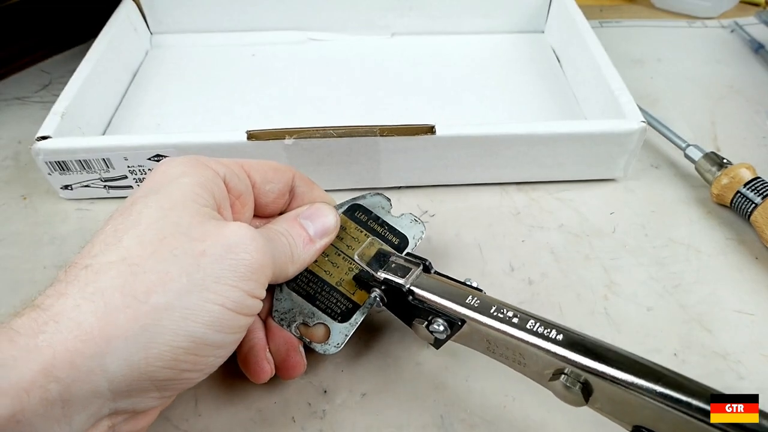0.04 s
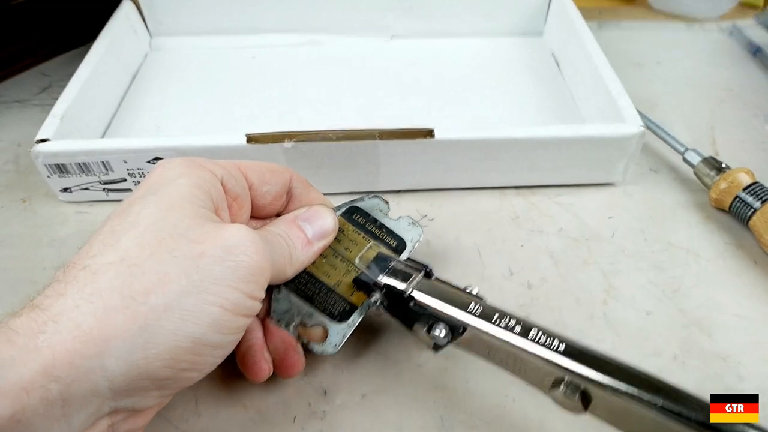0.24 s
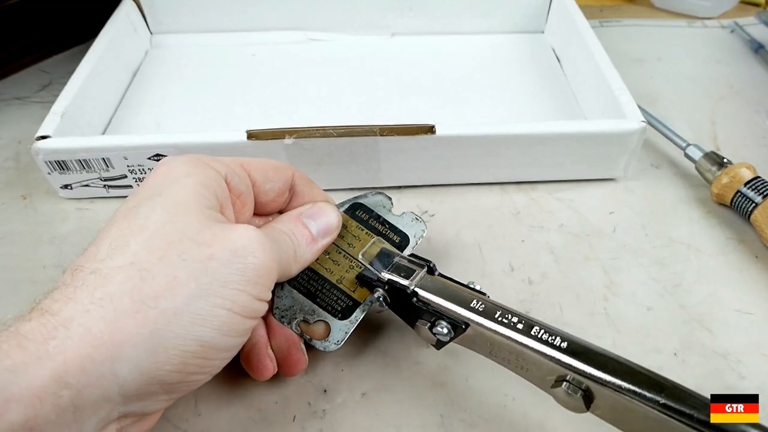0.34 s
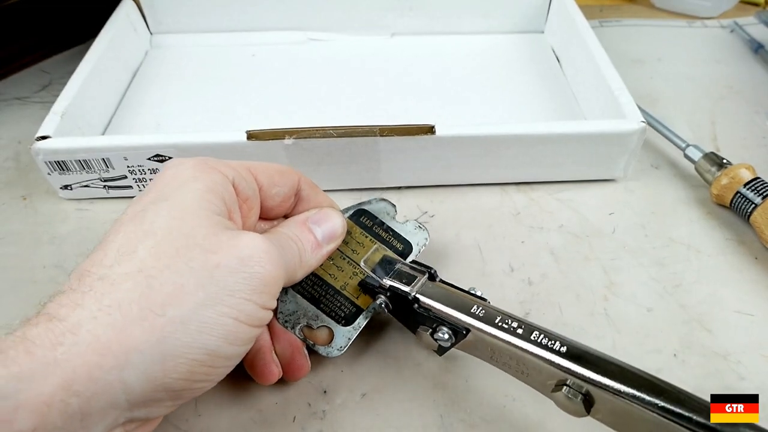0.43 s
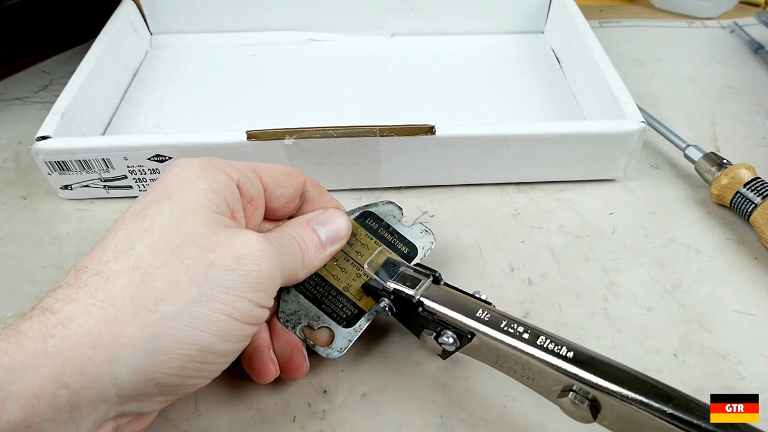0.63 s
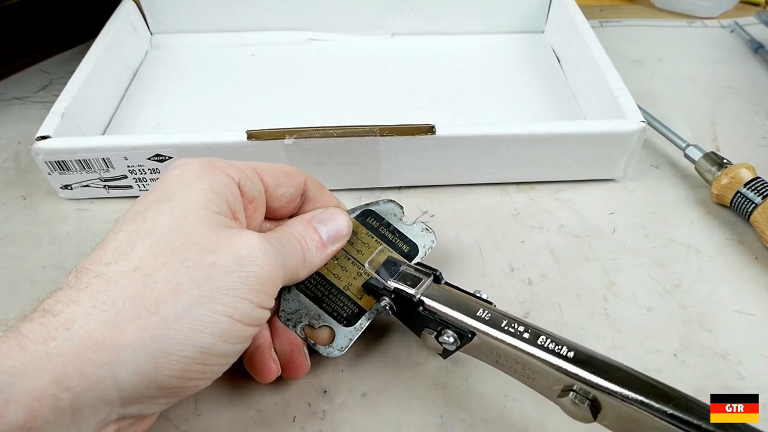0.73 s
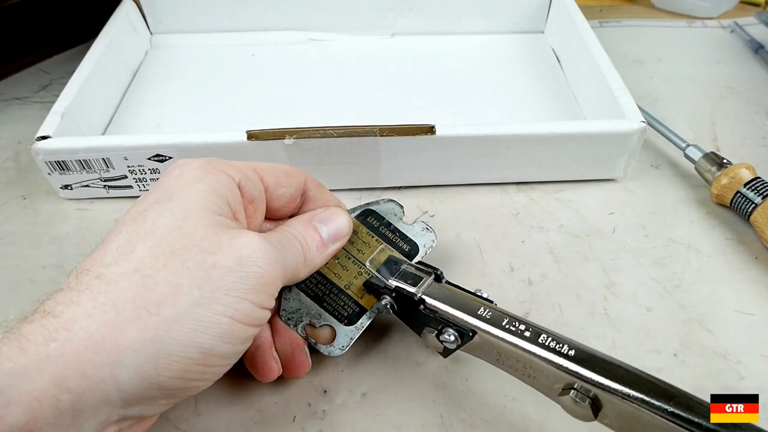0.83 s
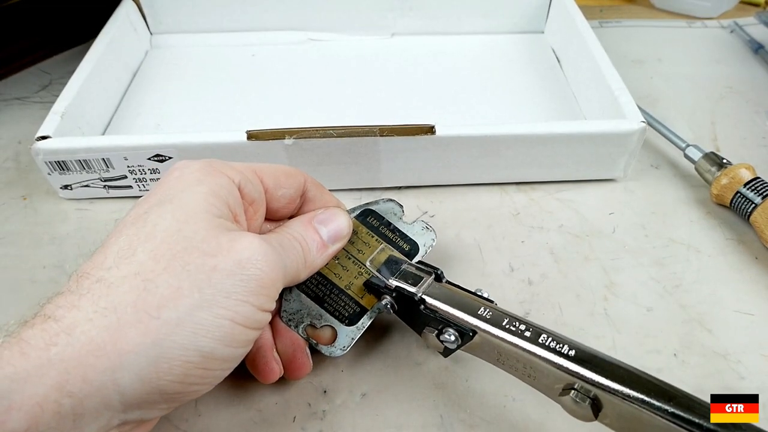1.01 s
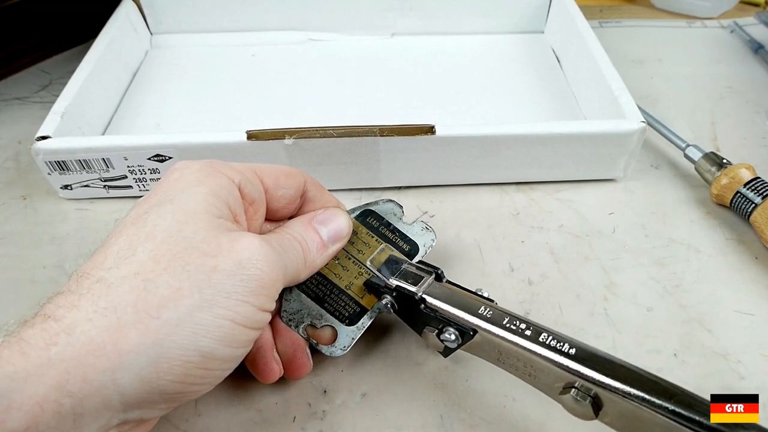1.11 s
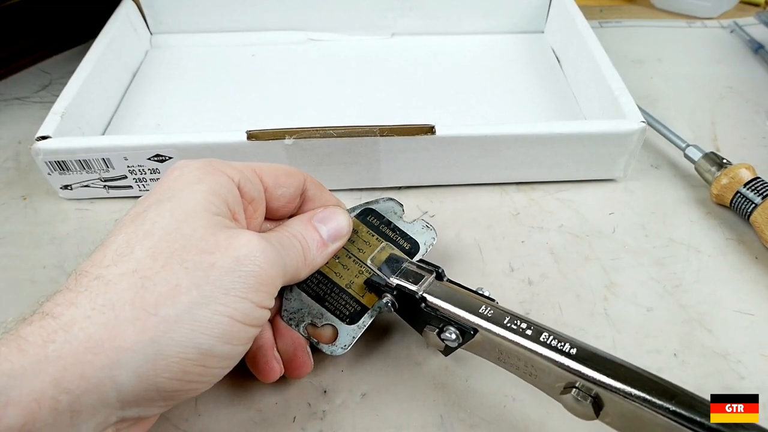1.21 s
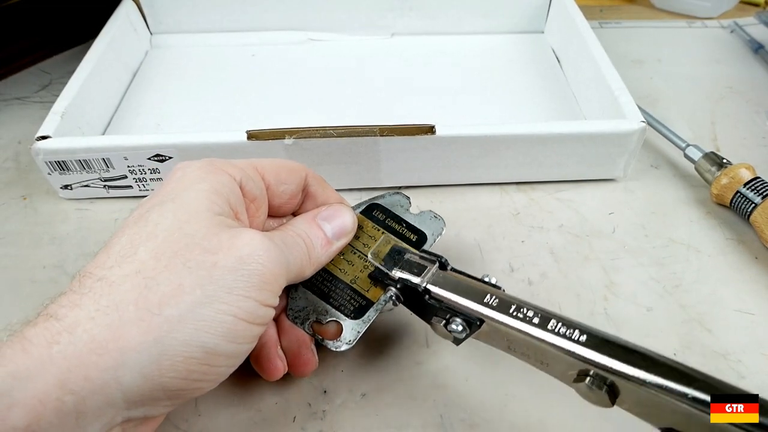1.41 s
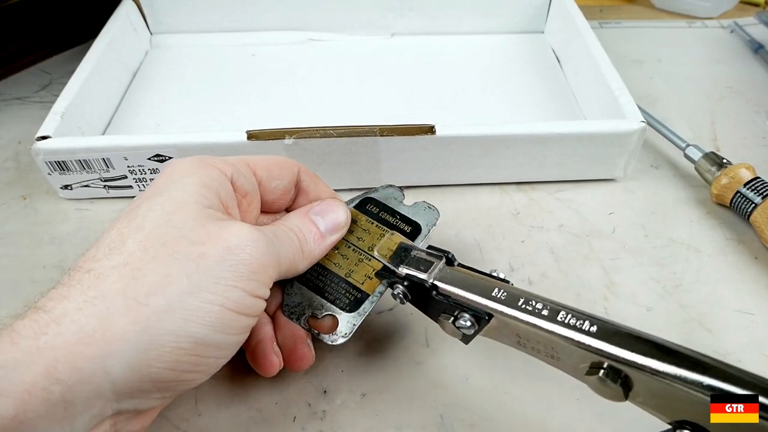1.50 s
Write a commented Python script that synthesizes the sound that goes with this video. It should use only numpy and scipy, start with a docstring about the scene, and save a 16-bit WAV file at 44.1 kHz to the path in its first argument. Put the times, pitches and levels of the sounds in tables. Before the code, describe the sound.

A hand nibbler snaps through thin steel with one loud, sharp metallic crack, very close up.

```python
"""A hand nibbler bites a thin steel plate, close to one microphone over a workbench.
Over room tone, hum and rustling hands, faint scrapes and ticks of the jaws come first, as shaped noise.
The steel tears and snaps: a noise crack and ringing modes overload the input, and jolts boom in the bench.
Tool and plate tick and scrape as they settle; the handles open with a squeak of two gliding tones,
and near the end the punch clicks free with one tiny bright pulse."""
import sys
import numpy as np
from scipy import signal
from scipy.fft import rfft, irfft, next_fast_len
from scipy.io import wavfile
from scipy.ndimage import map_coordinates

SR = 44100
rng = np.random.default_rng(int(sys.argv[2]) if len(sys.argv) > 2 else 0)


def materialize(psi):
    """Save the field psi as 16-bit PCM at rate SR to the path in sys.argv[1].

    A 1-D psi becomes a single channel; in a 2-D psi each row is a channel.
    """
    bounded = np.clip(np.atleast_2d(psi).T, -1, 1)
    quanta = np.round(bounded * 32767).astype(np.int16)
    wavfile.write(sys.argv[1], SR, quanta)


N = 68355
t = np.arange(N) / SR  # time in seconds


def amp(db):
    """Decibels to gain."""
    return 10 ** (np.asarray(db) / 20)


def unit(x):
    """Scale to rms 1."""
    return x / np.sqrt(np.mean(x ** 2) + 1e-20)


def along(points, hz):
    """Read (Hz, value) points at hz, in straight lines on a log frequency axis."""
    point_hz, values = np.transpose(points)
    return np.interp(np.log(hz + 1), np.log(point_hz + 1), values)


def curves(rows):
    """One value per sample for each column after the time."""
    times, *columns = np.transpose(rows)
    return [np.interp(t, times, column) for column in columns]


def wobble(rate):
    """A smooth random curve, rate knots a second."""
    return map_coordinates(rng.standard_normal(4096), [t * rate], mode="wrap")


def filtered(x, response):
    """Multiply the spectrum of x by a response of frequency."""
    size = next_fast_len(N + 8192)  # padded, so that the end does not wrap to the start
    spectrum = rfft(x, size) * response(np.fft.rfftfreq(size, 1 / SR))
    return irfft(spectrum, size)[:N]


def noise(colour):
    """Noise of rms 1; the colour sets only the shape of its spectrum."""
    return unit(filtered(rng.standard_normal(N), lambda hz: amp(along(colour, hz))))


def bell(hz, centre, octaves):
    """A bell-shaped gain on log frequency."""
    return np.exp(-.5 * (np.log2((hz + 1) / centre) / octaves) ** 2)


def decay(start, t60, attack=0.0006):
    """Fast rise at start, then an exponential fall by 60 dB in t60 seconds."""
    age = np.maximum(t - start, 0)
    return (1 - np.exp(-age / attack)) * np.exp(-np.log(1000) * age / t60)


def ring(start, hz, t60, attack=0.00022):
    """One struck mode: a sine that rises fast and dies away."""
    return decay(start, t60, attack) * np.sin(2 * np.pi * hz * (t - start))


SNAP_S = .2066
TEAR_LEAD_S, TEAR_DB, TEAR_RISE_DB = 0.0054, -26, 25.5  # the steel starts to tear just before
CRACK_DB, CRACK_T60_S = 3.5, .038
FLEX_HZ, FLEX_DB, FLEX_T60_S, FLEX_DELAY_S = 1752, 6, 0.017, .0027
STEEL_DB = -8  # added to every mode below
ROOM_DB = -10.5
# The crack of the break, close to the microphone. Each row: frequency in Hz, relative level in dB per Hz.
CRACK_COLOUR = [(100, -5.5), (200, -5.5), (330, -1), (500, -6.5), (900, -13.5), (1550, 2), (2800, -7.5),
                (4500, -7), (7000, 3), (9500, -1), (12000, -8), (16000, -18)]
# Modes of jaws, levers and plate.
# Each row: frequency in Hz, level in dB relative to STEEL_DB, t60 in seconds.
STEEL_MODES = [(650, -2, 0.065), (860, -25.5, 0.1), (1400, -10.5, 0.091), (1543, -12.5, 0.085),
               (1750, -12, 0.099), (1831, -8.5, .155), (2630, -18, .13), (3930, -13, 0.097),
               (5297, -17, 0.19), (5990, -13.5, 0.14), (6670, -11, .18), (6853, -11, 0.088),
               (7460, -11, .14), (8090, -13, .16), (9210, -12, 0.22), (10206, -16.5, .17),
               (11713, -19.5, 0.1)]


def snap():
    """The steel tears in swelling noise, cracks through and sets plate and tool ringing."""
    lead = (SNAP_S - t) / TEAR_LEAD_S  # 1 where the tear starts, 0 at the snap
    tearing = (lead > 0) & (lead < 1)
    tear = amp(TEAR_DB - TEAR_RISE_DB * np.clip(lead, 0, 1)) * tearing
    crack_level = amp(CRACK_DB) * decay(SNAP_S, CRACK_T60_S)
    crack = noise(CRACK_COLOUR) * (tear + crack_level)
    # the freed plate slaps against the die
    flex = amp(FLEX_DB) * ring(SNAP_S + FLEX_DELAY_S, FLEX_HZ, FLEX_T60_S)
    modes = sum(amp(db) * ring(SNAP_S, hz, t60) for hz, db, t60 in STEEL_MODES)
    room = amp(ROOM_DB) * room_tail(SNAP_S)
    return crack + flex + amp(STEEL_DB) * modes + shimmer() + room


SHIMMER_DB, SHIMMER_T60_S = -11, 0.18
SHIMMER_LOW_HZ, SHIMMER_HIGH_HZ = 2400, 15230
SHIMMER_TOP_HZ, SHIMMER_OCTAVES = 7100, .55  # centre and width of the strongest region
# Treble balance of the upper modes. Each row: frequency in Hz, gain in dB.
SHIMMER_TREBLE = [(10000, 0.5), (12000, -0.5), (13500, -3.5), (15300, -9)]


def shimmer():
    """Many close, quickly damped modes of the steel levers, as sines of random pitch and phase."""
    pitch = rng.uniform(SHIMMER_LOW_HZ, SHIMMER_HIGH_HZ, 420)
    phases = rng.uniform(0, 2 * np.pi, len(pitch))
    gains = bell(pitch, SHIMMER_TOP_HZ, SHIMMER_OCTAVES) * amp(along(SHIMMER_TREBLE, pitch))
    lines = np.zeros(N // 2 + 1, complex)
    bins = np.round(pitch * N / SR).astype(int)
    lines[bins] = gains * np.exp(1j * phases)
    return amp(SHIMMER_DB) * unit(irfft(lines, N)) * decay(SNAP_S, SHIMMER_T60_S)


# Jolts passed to the bench: two from the recoil of the snap, then a soft bump later on. Each row: start in
# seconds, level in dB.
JOLTS = [(0.2218, -11.5), (0.2873, -20.5), (0.488, -37)]
# Modes of the bench under the microphone.
# Each row: frequency in Hz, level in dB relative to the jolt, t60 in seconds.
BENCH_MODES = [(43.34, -8, 0.45), (58.32, 3, 0.11), (83.5, -2, 0.14), (132.8, -11, 0.38)]


def bench():
    """Each jolt strikes all the low modes of the bench, which boom."""
    return sum(amp(jolt_db + mode_db) * ring(start, hz, t60, attack=0.0055)
               for start, jolt_db in JOLTS for hz, mode_db, t60 in BENCH_MODES)


UPPER_RATIO = 1.349  # pitch of the upper tone over the lower
SQUEAK_JITTER, SQUEAK_FLUTTER_DB = 0.0066, 2.5  # random pitch (as a fraction) and level
HAZE_DB, HAZE_SPREAD = -15, 0.087  # side tones, set off by this fraction of the pitch
# Rubbing squeak while the handles open.
# Each row: time in seconds, lower pitch in Hz, level of the lower tone in dB, level of the upper tone in dB.
SQUEAK_PATH = [(1.0, 5500, -100, -81), (1.05, 6810, -99, -72.5), (1.085, 7327, -78.5, -68),
               (1.12, 7720, -72, -61.5), (1.16, 8020, -66.5, -71), (1.2, 8620, -60.5, -72),
               (1.235, 8210, -65, -71), (1.265, 7490, -76, -69), (1.281, 7500, -82, -94),
               (1.295, 8280, -68, -92), (1.318, 9500, -59.5, -77), (1.333, 10100, -56, -88),
               (1.345, 9710, -60.5, -77), (1.362, 8200, -69, -65), (1.38, 7010, -98, -75)]


def squeak():
    """Two thin friction tones glide together in pitch, each with unsteady side tones."""
    hz, low_db, high_db = curves(SQUEAK_PATH)
    sounding = (t > SQUEAK_PATH[0][0]) & (t < SQUEAK_PATH[-1][0])

    def tone(pitch, db):
        """One line of the squeak."""
        jittered = pitch * (1 + SQUEAK_JITTER * wobble(900))
        phase = 2 * np.pi * np.cumsum(jittered) / SR
        haze = amp(HAZE_DB) * wobble(40) * np.sin(HAZE_SPREAD * phase)
        level = amp(db + SQUEAK_FLUTTER_DB * wobble(150))
        return level * unit((1 + haze) * np.sin(phase))

    return sounding * (tone(hz, low_db) + tone(hz * UPPER_RATIO, high_db))


RELEASE_S, RELEASE_DB, RELEASE_ROOM_DB = 1.476, -24, -11.5
RELEASE_HZ, RELEASE_WIDTH_S = 10960, .00008


def release():
    """The punch clicks out of the cut: one tiny bright pulse, a sine under a bell-shaped envelope."""
    age = t - RELEASE_S
    envelope = np.exp(-.5 * (age / RELEASE_WIDTH_S) ** 2)
    pulse = envelope * np.sin(2 * np.pi * RELEASE_HZ * age)
    return in_room(amp(RELEASE_DB) * pulse, RELEASE_ROOM_DB)


KNOCK_T60_S, TICK_ROOM_DB = .05, -18
# Small contacts of jaws, plate and linkage, before the treble loss below. Each row: start in seconds,
# click level in dB, centre in Hz, width in octaves, click t60 in seconds, level of the plate's knock in dB.
TICKS = [(0.0824, -47.5, 2800, 1.7, .035, -47.5), (.1535, -41.5, 3900, 1.2, 0.011, -53.5),
         (.405, -48, 536, 0.84, 0.071, -53), (.459, -53.5, 800, 1.05, .04, -56),
         (0.563, -57, 1200, 2.1, 0.014, -47), (0.615, -55.5, 9000, 0.63, .015, -77),
         (.644, -48.5, 1680, 0.63, 0.027, -50.5), (0.6991, -39.5, 8300, 0.2, 0.0057, -64),
         (.699, -49.5, 3460, 0.76, 0.014, -77), (1.244, -56.5, 2000, 0.39, 0.032, -70),
         (1.34, -52, 1500, 1.16, 0.014, -50.5), (1.417, -53, 1848, 0.33, 0.028, -56.5),
         (1.487, -55, 900, .8, 0.039, -51), (1.53, -49.5, 2323, .28, 0.017, -72)]
# The hand-damped plate. Each row: frequency in Hz, relative level in dB per Hz.
KNOCK_COLOUR = [(80, -10), (300, -6.5), (480, -7.5), (620, 1), (800, -1), (1000, -11.5), (1700, -15),
                (3000, -32), (10000, -58)]
# Soft contacts lose their top. Each row: frequency in Hz, gain in dB.
TICK_TREBLE = [(10000, 0.5), (12000, -4), (16000, -14.5)]


def ticks():
    """Light contacts, each a noise click and a dull knock of the held plate, with a little room."""
    plate = noise(KNOCK_COLOUR)
    contacts = np.zeros(N)
    for start, click_db, centre, octaves, t60, knock_db in TICKS:
        grain = unit(filtered(rng.standard_normal(N), lambda hz: bell(hz, centre, octaves)))
        contacts += amp(click_db) * decay(start, t60, attack=0.00022) * grain
        contacts += amp(knock_db) * decay(start, KNOCK_T60_S) * plate
    softened = filtered(contacts, lambda hz: amp(along(TICK_TREBLE, hz)))
    return in_room(softened, TICK_ROOM_DB)


SCRAPE_ROUGH_DB = 2  # depth of the random roughness
# Steel sliding on steel. Each row: start in seconds, length in seconds, body level in dB, hiss level in dB.
SCRAPES = [(-.02, 0.058, -61, -69), (0.079, 0.027, -59, -62), (0.099, .04, -81, -68.5),
           (0.153, 0.035, -80, -58.5), (0.431, .055, -65.5, -60.5), (.465, 0.074, -61, -65),
           (0.529, 0.07, -59, -56.5), (.76, 0.21, -66, -72.5), (1.29, 0.093, -64, -68),
           (1.365, 0.075, -62, -61.5), (1.462, 0.094, -62, -62.5)]
# Lower part of the sliding. Each row: frequency in Hz, relative level in dB per Hz.
SCRAPE_BODY = [(100, -21), (550, 1), (1100, -6), (2100, -2), (3500, -19.5), (8000, -22.5)]
# Upper part of the sliding. Each row: frequency in Hz, relative level in dB per Hz.
SCRAPE_HISS = [(1000, -26), (3000, -10), (6000, -4.5), (7200, -3.5), (8800, 1), (11000, -11),
               (12500, -22.5), (16000, -40)]


def scrapes():
    """Short rough slides: two bands of noise that swell and fade."""
    body, hiss = noise(SCRAPE_BODY), noise(SCRAPE_HISS)
    slides = np.zeros(N)
    for start, length, body_db, hiss_db in SCRAPES:
        swell = np.sin(np.pi * np.clip((t - start) / length, 0, 1))
        slides += swell * (amp(body_db) * body + amp(hiss_db) * hiss)
    roughness = unit(amp(SCRAPE_ROUGH_DB * wobble(400)))
    return slides * roughness


# The workshop's diffuse answer. Each row: frequency in Hz, relative level in dB per Hz.
ROOM_COLOUR = [(60, -13.5), (200, -6.5), (500, -4), (950, -8), (1400, 0.5), (1850, 1.5), (2700, -6.5),
               (4500, -3), (7000, 0.5), (9500, -3), (12000, -11), (15000, -17.5), (16000, -28)]
# How long the workshop rings. Each row: frequency in Hz, t60 in seconds.
ROOM_T60 = [(150, 0.42), (450, .35), (700, 0.28), (1200, .2), (4000, 0.19), (9000, .18), (15000, .17)]


def room_tail(start):
    """Diffuse sound of the workshop: noise that decays band by band; the bass lingers longest."""
    hz, times, bands = signal.stft(noise(ROOM_COLOUR), SR, nperseg=256)
    age = np.maximum(times - start, 0)
    fall = np.exp(-np.log(1000) * age / along(ROOM_T60, hz)[:, None])
    tail = signal.istft(bands * fall, SR, nperseg=256)[1][:N]
    return tail * np.clip((t - start) / .004, 0, 1)  # fades in over 4 ms


def in_room(dry, room_db):
    """A small sound plus the workshop's answer, by convolution with a tail of unit energy."""
    tail = room_tail(0)
    answer = signal.fftconvolve(dry, tail / np.linalg.norm(tail))[:N]
    return dry + amp(room_db) * answer


FLOOR_DB = -53.5
HUM_HZ, HUM_DB = 60, -58
# Room tone at the microphone. Each row: frequency in Hz, relative level in dB per Hz.
FLOOR_COLOUR = [(12, -14.5), (25, -2), (42, 2), (100, -17), (230, -19), (500, -36.5), (1100, -42.5),
                (2000, -42), (7000, -45.5), (11000, -49), (16000, -59)]
# Rustle of the moving hands. Each row: time in seconds, level in dB.
HANDS_LEVEL = [(0, -60.5), (.36, -67), (.56, -57.5), (.72, -68), (.95, -71), (1.2, -60.5), (1.34, -61),
               (1.43, -67.5), (1.55, -63.5)]
# Colour of the rustle. Each row: frequency in Hz, relative level in dB per Hz.
HAND_COLOUR = [(40, -13.5), (150, 1.5), (300, -3), (700, -7.5), (1500, -21), (5000, -39.5), (16000, -50)]


def background():
    """Steady noise for room tone, a sine of mains hum, and swelling noise for the hands' shifting grip."""
    floor = amp(FLOOR_DB) * noise(FLOOR_COLOUR)
    hum = amp(HUM_DB) * unit(np.sin(2 * np.pi * HUM_HZ * t))
    hands_db, = curves(HANDS_LEVEL)
    hands = amp(hands_db) * noise(HAND_COLOUR)
    return floor + hum + hands


def scene():
    """One microphone feeds both channels."""
    mono = snap() + bench() + squeak() + release() + ticks() + scrapes() + background()
    return np.array([mono, mono])


CLIP_TOP, CLIP_HARDNESS = 1, 4.9  # ceiling as full scale; a higher hardness bends more sharply
TOP_HZ = 15900  # middle of a slope 600 Hz wide


def record(dry):
    """The input saturates towards its ceiling, then cuts what lies above its band limit."""
    overload = np.abs(dry / CLIP_TOP) ** CLIP_HARDNESS
    clipped = dry / (1 + overload) ** (1 / CLIP_HARDNESS)
    return np.array([filtered(side, lambda hz: np.clip((TOP_HZ - hz) / 600 + .5, 0, 1))
                     for side in clipped])


dry = scene()
out = record(dry)
materialize(out)
```